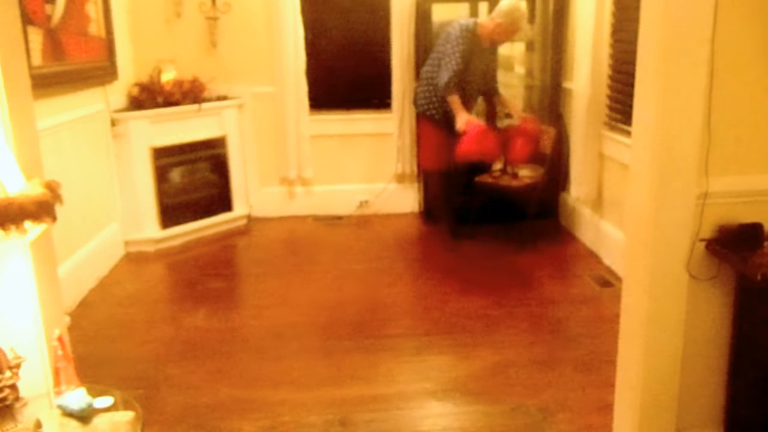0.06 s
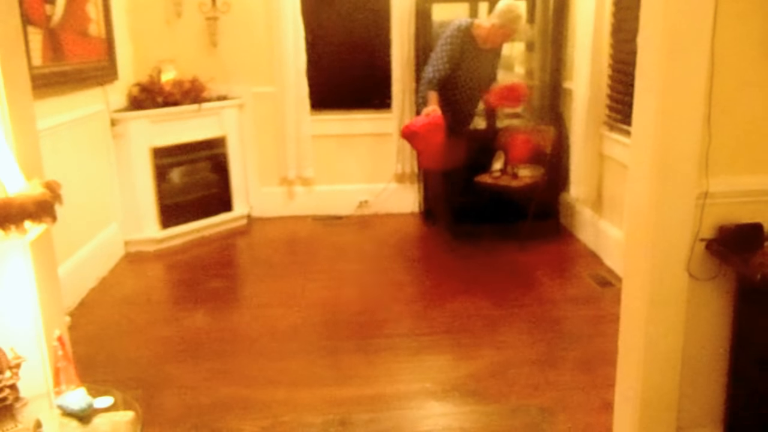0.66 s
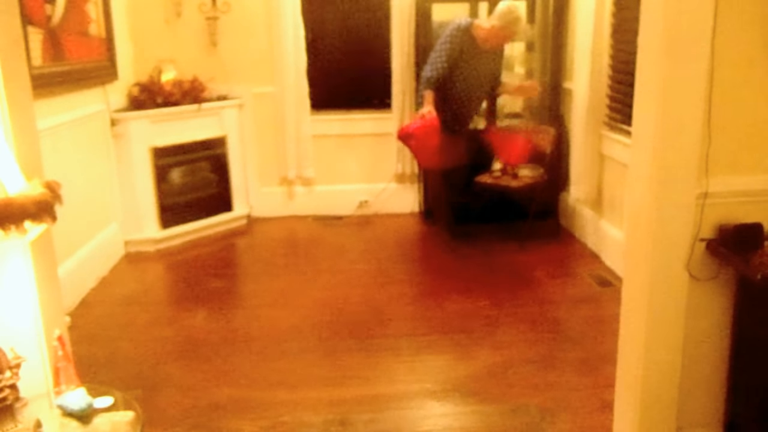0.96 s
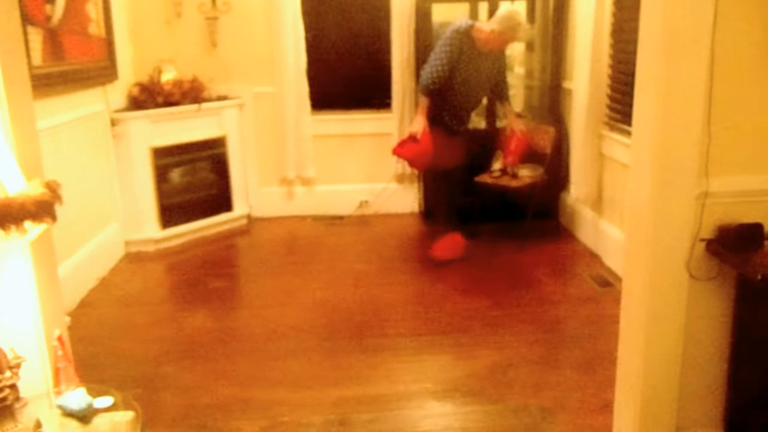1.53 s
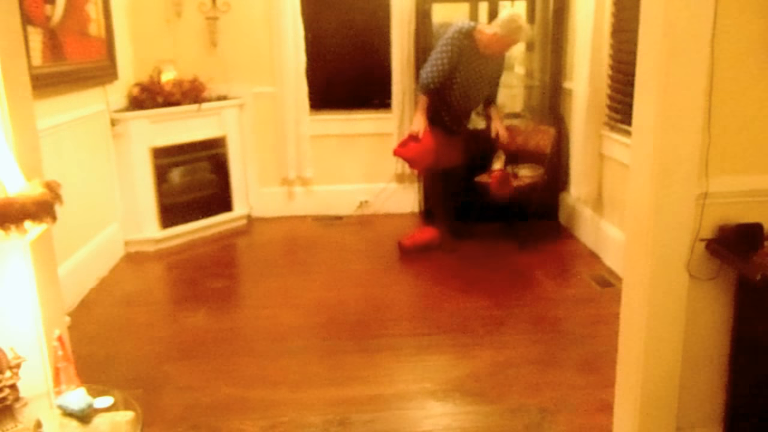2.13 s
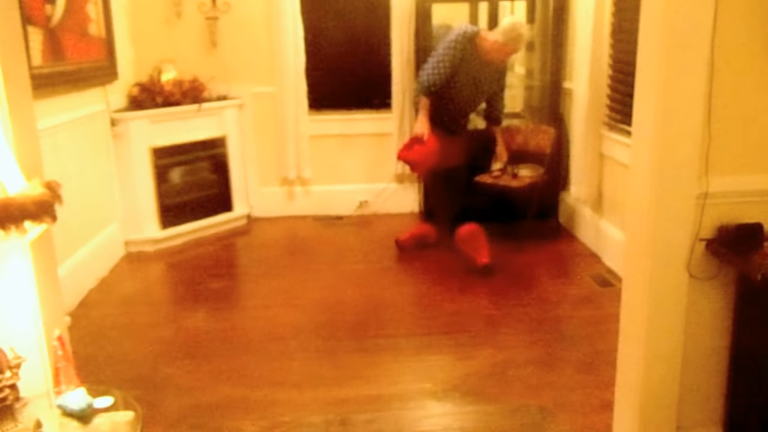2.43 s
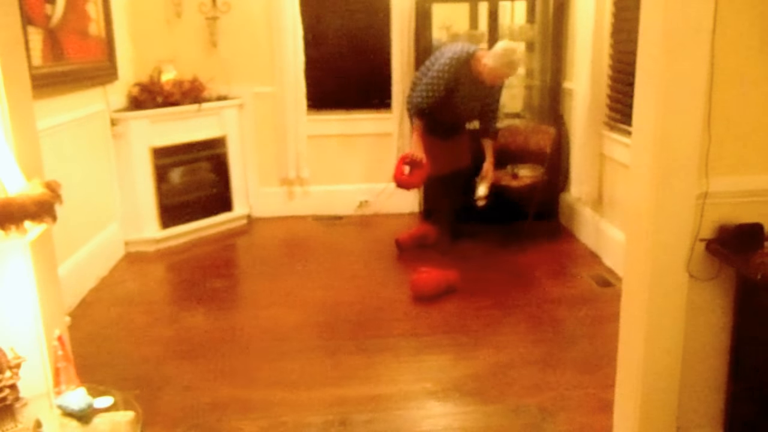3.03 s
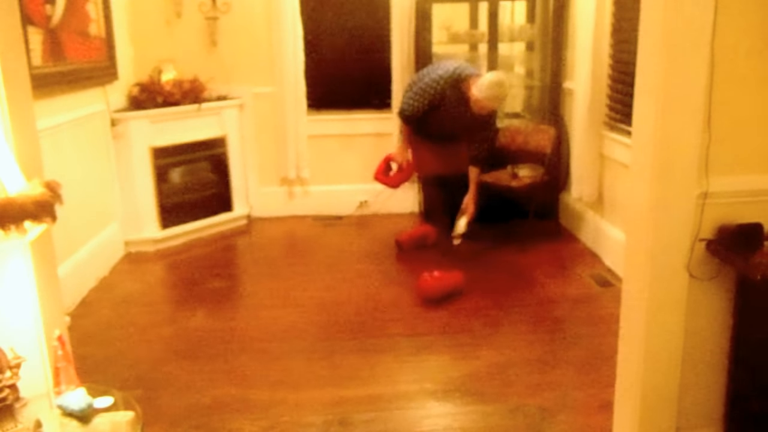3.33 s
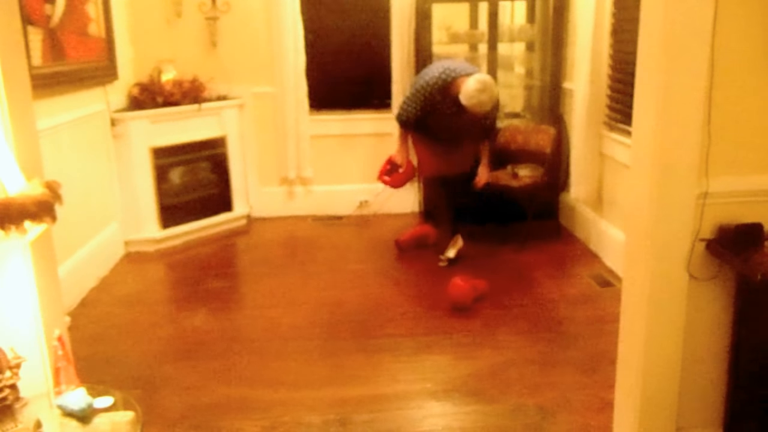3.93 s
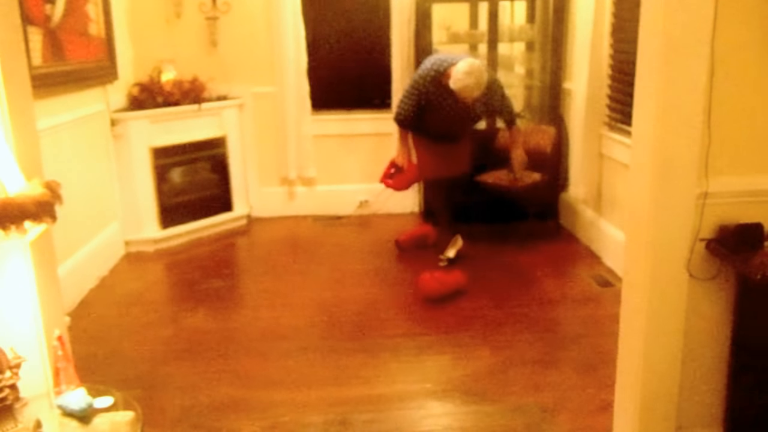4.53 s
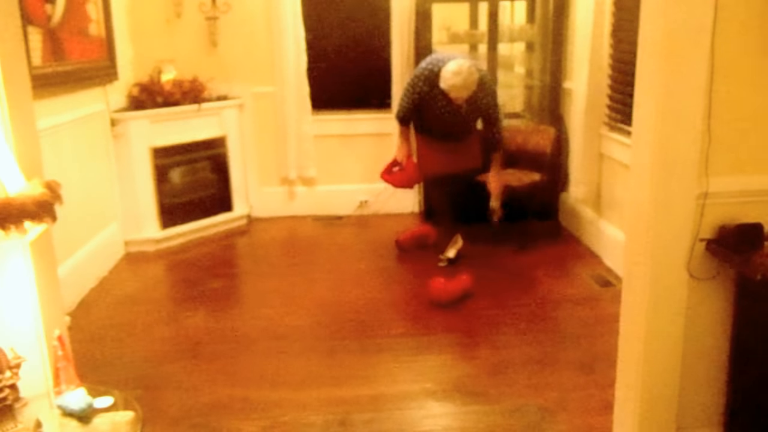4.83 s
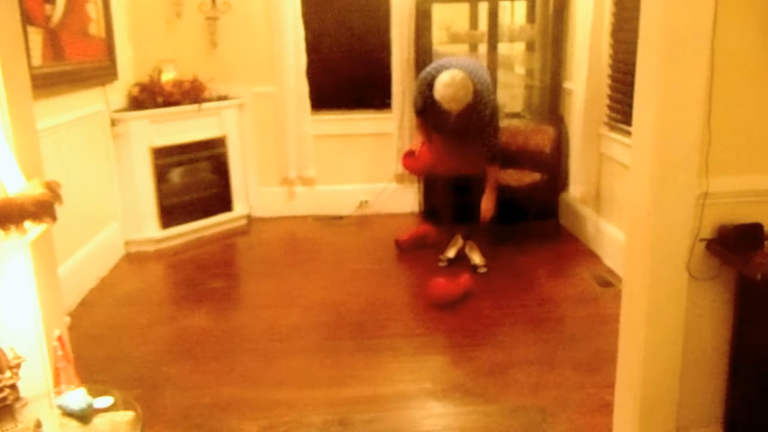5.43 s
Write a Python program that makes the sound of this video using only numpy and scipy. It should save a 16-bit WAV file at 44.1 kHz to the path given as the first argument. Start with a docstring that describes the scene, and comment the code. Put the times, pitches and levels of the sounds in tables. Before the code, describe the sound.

Shoes are dropped on a wooden floor, heard by one microphone across an echoing room. First come two flat slipper slaps, each followed by small bounces, then two louder, sharper heel knocks with soft footfalls and a tiny creak between them. The floorboards give a short low boom under each landing. Quiet clothing rustle, light handling clicks and a low appliance hum fill the gaps.

```python
"""A bare living room with a hardwood floor, one microphone across the room, an appliance humming.
Clothes rustle and feet shift as someone starts clearing shoes off a chair. Two slippers are tossed
down, slap the boards and tumble. A heeled shoe drops with a light touch and a hard knock; another
creaks as it is picked up, then drops too. After each knock the boards boom, the joists sway and
the room rings out."""
import sys
import numpy as np
from scipy import signal
from scipy.fft import rfft, irfft
from scipy.io import wavfile
from scipy.ndimage import uniform_filter1d

SR = 44100
rng = np.random.default_rng(int(sys.argv[2]) if len(sys.argv) > 2 else 0)


def wrap_up_sound(samples):
    """Save the sound to the file named by the first command line argument, as 16-bit audio."""
    columns = np.atleast_2d(samples).T
    # keep every value between -1 and 1, then stretch to whole-number steps
    tamed = np.clip(columns, -1, 1)
    steps = np.round(tamed * 32767).astype(np.int16)
    wavfile.write(sys.argv[1], SR, steps)


N = 245460
BLOW_SAMPLES = 44100   # one contact and its decay
TIME = np.arange(N) / SR
BLOW_TIME = TIME[:BLOW_SAMPLES]
BIN_HZ = np.fft.rfftfreq(BLOW_SAMPLES, 1 / SR)


# Slippers landing and bouncing, across the room. Each row: start in seconds, level in dB, bass in dB,
# treble tilt in dB per octave, direct crack in dB, shoe resonance in Hz, its peak in dB,
# board ring in dB, its centre in Hz, joist sway in dB.
SLIPPER_LANDINGS = [(1.1638, -11, -8, -2, 8, 1530, 2.5, -9, 148.6, -10),
                    (1.5320, -27, 5, 1.5, 2, 670, 7.5, -44, 90.5, -16),
                    (1.9450, -41, 2, 1, 0, 770, 5.5, -40, 218, -47),
                    (2.2705, -14.5, 0.5, -1.7, 5, 440, -7.5, -28, 275, -11.5),
                    (2.6195, -34.5, 10.5, 1.9, 3, 935, 8.5, -35, 232, -19.5),
                    (2.7810, -46, 16, 3.5, -8, 1800, 0, -38, 183, -20)]
# The slap of a sole on hardwood. Each row: frequency in Hz, relative level in dB.
SOLE_SPECTRUM = [(30, 2), (60, 22.5), (90, 15), (130, 9.5), (300, 10.5), (500, 2), (1000, -2), (2000, -1.5),
                 (4000, -2.5), (6000, -7), (9000, -11.5), (14000, -23.5), (16000, -48)]


def slippers():
    """Flat soles slap the boards, then tumble in softer bounces."""
    return landings(SLIPPER_LANDINGS, SOLE_SPECTRUM, bass_hz=474)


# Heeled shoes on the same floor, first touch then full weight. Each row reads as for the slippers.
HEEL_LANDINGS = [(3.6152, -22, -5, 5.5, -1, 2400, 4, -44, 90, -16.5),
                 (3.6446, -2, 0.5, -1.7, -8, 2070, -5.5, -10, 327, -26),
                 (5.2867, -18.5, -11, 2, -3, 1050, -5, -29, 120, -45),
                 (5.3180, -0.9, 0.2, -1.34, -0.5, 2700, 2.5, -12, 213, -27)]
# The knock of a heel. Each row: frequency in Hz, relative level in dB.
HEEL_SPECTRUM = [(30, -11), (60, 1), (90, 6), (130, 3.5), (280, 9.5), (420, 6), (560, 2), (800, -1),
                 (1100, 1), (1600, -4), (2200, -6), (3200, -14), (5000, -21.5), (8000, -32.5),
                 (14000, -47.5)]
# Metal in the heel. Each row: frequency in Hz, level in dB against the landing, 60 dB decay in seconds.
HEEL_PIN_MODES = [(6230, -52, 0.66), (11750, -63, 0.88), (12730, -64, 0.52)]


def heeled_shoes():
    """Hard heels knock on the wood, and the metal in them rings faintly."""
    out = landings(HEEL_LANDINGS, HEEL_SPECTRUM, bass_hz=453)
    for start, level_db, *_ in HEEL_LANDINGS:
        add(out, start, from_db(level_db) * rings(HEEL_PIN_MODES))
    return out


def landings(rows, spectrum, bass_hz):
    """Each landing sends a coloured crack into the room and sets the boards and joists going."""
    out = np.zeros(N)
    bass_shelf = 1 / (1 + (BIN_HZ / bass_hz) ** 3)
    for start, level_db, bass_db, tilt_db, direct_db, body_hz, body_db, ring_db, ring_hz, sway_db in rows:
        tone_db = bass_db * bass_shelf + treble(tilt_db) + shoe_body(body_hz, body_db)
        crack = colour(room(direct_db), at_hz(spectrum, BIN_HZ) + level_db + tone_db)
        add(out, start, crack + from_db(ring_db) * floorboards(ring_hz) + from_db(sway_db) * joists())
    return out


# The boom of the floor. Each row: frequency in Hz, relative level in dB, 60 dB decay in seconds.
BOARD_MODES = [(60, -4, 0.81), (92.2, 3, 0.44), (129, -7, 0.35), (164.6, 1.5, 0.43), (176, -7, 0.37),
               (210, -17, 0.62), (233.9, -7.5, 0.68), (258.3, -11, 0.71), (296.4, -1, 0.49),
               (318, -5, 0.64), (351.5, -8.5, 0.86), (380, -8, 0.8), (445.6, -4, 0.57), (528, -24, 0.47)]


def floorboards(centre_hz, falloff_db=14.5, swell_s=0.014):
    """The struck spot favours the modes near one pitch; they swell as the wave crosses the floor."""
    favoured = [(hz, db - falloff_db * np.log2(hz / centre_hz) ** 2, t60) for hz, db, t60 in BOARD_MODES]
    swell = 1 - np.exp(-BLOW_TIME / swell_s)
    return rings(favoured, scatter_db=3.5) * swell * bass_return()


def joists(hz=22.44, t60_s=0.61, swell_s=0.052, gain_db=9.0):
    """The whole floor bounces slowly on its joists."""
    envelope = from_db(gain_db - 60 * BLOW_TIME / t60_s) * (1 - np.exp(-BLOW_TIME / swell_s))
    return envelope * np.sin(2 * np.pi * hz * BLOW_TIME)


# Feet shifting by the chair. Each row: start in seconds, level in dB, treble tilt in dB per octave,
# board ring in dB, its centre in Hz, joist sway in dB.
FOOTFALLS = [(0.116, -40, 1, -47.5, 190, -57), (2.950, -36.5, 5.5, -42.5, 303, -30),
             (4.477, -33.5, -4, -38.5, 100, -58), (4.583, -29.5, -2, -36.5, 163, -25.5),
             (4.835, -34, -3, -43.5, 129, -50), (5.039, -52, -9, -44, 129, -35)]
# The pad of a foot. Each row: frequency in Hz, relative level in dB.
FOOT_SPECTRUM = [(30, -25), (100, 6.5), (200, 11), (400, -10), (1000, -26), (4000, -29), (14000, -47)]


def steps(direct_db=-15.0):
    """Soft footfalls: a dull pad, with the boards and joists under it."""
    out = np.zeros(N)
    for start, level_db, tilt_db, ring_db, ring_hz, sway_db in FOOTFALLS:
        pad = colour(room(direct_db), at_hz(FOOT_SPECTRUM, BIN_HZ) + level_db + treble(tilt_db))
        add(out, start, pad + from_db(ring_db) * floorboards(ring_hz) + from_db(sway_db) * joists())
    return out


# Shoes handled at the chair. Each row: start in seconds, level in dB, treble tilt in dB per octave,
# direct sound in dB, shoe resonance in Hz, its peak in dB.
HANDLING_CLICKS = [(.104, -43, -1, -5, 1100, -1), (.158, -42.5, -1.5, -6, 4500, 5),
                   (0.465, -53.5, -2, 0, 1720, 10), (.692, -50, -1, 2.5, 4000, 2),
                   (2.950, -42.5, -6, -3, 590, 6), (4.264, -39, -6.5, -15, 2800, 0)]
# One small click. Each row: frequency in Hz, relative level in dB.
CLICK_SPECTRUM = [(30, -7), (400, 3), (1200, 2.5), (1800, -3.5), (2400, -0.5), (5000, -3.5), (9000, -11),
                  (14000, -26)]
# A shoe buckle. Each row: frequency in Hz, relative level in dB, 60 dB decay in seconds.
BUCKLE_MODES = [(2320, -12, 0.027), (2600, -10, .04), (4050, -17, .03), (4800, -13, .03), (6000, -16, .025)]


def handling():
    """Light clicks with a short buckle ring: they reach the room but do not move the floor."""
    out = np.zeros(N)
    for start, level_db, tilt_db, direct_db, body_hz, body_db in HANDLING_CLICKS:
        tone_db = treble(tilt_db) + shoe_body(body_hz, body_db, octaves=0.47)
        click = colour(room(direct_db), at_hz(CLICK_SPECTRUM, BIN_HZ) + level_db + tone_db)
        add(out, start, click + from_db(level_db + direct_db) * rings(BUCKLE_MODES))
    return out


def creak(start_s=4.4137, level_db=-38.5, slips=3, gap_s=0.00225, slip_loss_db=6.0, low_cut_hz=1500):
    """A lifted shoe creaks: quick, evenly spaced slips give a thin pitched click and shake the buckle."""
    low_cut_db = -10 * np.log10(1 + (low_cut_hz / (BIN_HZ + 1)) ** 4)
    tone_db = at_hz(CLICK_SPECTRUM, BIN_HZ) + shoe_body(2350, peak_db=1.0, octaves=0.19) + low_cut_db
    slip = colour(room(direct_db=4.0), tone_db) + from_db(6.0) * rings(BUCKLE_MODES)
    out = np.zeros(N)
    for k in range(slips):
        add(out, start_s + k * gap_s, from_db(level_db - k * slip_loss_db) * slip)
    return out


# Arm and body movements at the chair. Each row: start in seconds, length in seconds, level in dB.
MOVEMENTS = [(-.02, .1, -59), (.07, .09, -54.5), (0.678, 0.054, -62), (2.737, 0.18, -57.5),
             (3.113, 0.31, -56), (3.466, 0.1, -59.5), (4.26, 0.31, -60), (4.79, 0.12, -60),
             (5.126, 0.18, -59.5)]
# Cloth rubbing on cloth. Each row: frequency in Hz, relative level in dB.
CLOTH_SPECTRUM = [(300, -29), (1200, -5), (3000, 1.5), (5500, -1.5), (9000, -8), (14000, -17.5)]


def rustle(attack_s=0.057, fade_db_per_s=110, grain_db=0.5):
    """Each movement swells, holds and dies away; the cloth slides with a slightly uneven grain."""
    power = 0
    for start, length_s, level_db in MOVEMENTS:
        swell = np.clip((TIME - start) / attack_s, 0, 1)
        fade_db = fade_db_per_s * np.maximum(TIME - start - length_s, 0)
        power += (swell * from_db(level_db - fade_db)) ** 2
    grain = rms_one(uniform_filter1d(rng.standard_normal(N), size=400))
    return rms_one(noise(CLOTH_SPECTRUM)) * np.sqrt(power) * from_db(grain_db * grain)


# The nearest surfaces. Each row: delay at the microphone in seconds, gain against the direct sound.
NEAR_ECHOES = [(.0011, 0.2), (.002, 0.38), (.0043, 0.3), (.0052, .33), (0.0127, 0.45)]
# Bright plank overtones. Each row: frequency in Hz, relative level in dB, 60 dB decay in seconds.
PLANK_MODES = [(634, -22, 0.65), (720, -20, 0.37), (765, -28, 0.78), (848, -25.5, 0.34), (929, -32, 0.89),
               (1033, -21.5, 0.66), (1166, -31, 0.9), (1211, -20.5, 0.44), (1390, -23.5, 0.41),
               (1480, -29, 0.33), (1975, -19, .35), (2070, -17.5, 0.25), (2167, -22.5, 0.33),
               (3410, -20, 0.33), (5000, -26, 0.23)]


def room(direct_db, crack_db=21.5, crispness=0.43, build_s=0.00079, planks_db=-2.0):
    """One click as it reaches the microphone: direct sound, near echoes, then tail and ringing planks."""
    out = room_tail() + from_db(planks_db) * rings(PLANK_MODES)
    out *= 1 - np.exp(-BLOW_TIME / build_s)
    direct = from_db(crack_db + direct_db)
    out[:2] += direct * np.array([1 + crispness, -crispness])   # the straight path keeps the most treble
    for delay_s, strength in NEAR_ECHOES:
        out[round(delay_s * SR)] += strength * direct
    return out


# The ring of the bare room. Each row: band centre in Hz, 60 dB decay in seconds.
ROOM_DECAY = [(60, 0.58), (200, 0.77), (560, 0.74), (1500, 0.66), (4000, 0.56), (7000, 0.47), (13000, 0.32)]


def room_tail(first_echoes_per_s=1500, thicken_s=0.02):
    """Scattered echoes crowd ever closer together and die away band by band."""
    density = np.clip(first_echoes_per_s / SR * (1 + (BLOW_TIME / thicken_s) ** 2), 1e-3, 1)
    signs = rng.choice([-1, 1], BLOW_SAMPLES)
    arrivals = rng.random(BLOW_SAMPLES) < density
    echo_spectrum = rfft(signs * arrivals / np.sqrt(density))
    tail, centres = 0, [hz for hz, _ in ROOM_DECAY]
    for this_band, (hz, t60) in zip(np.eye(len(centres)), ROOM_DECAY):
        band_gain = at_hz(list(zip(centres, this_band)), BIN_HZ)
        band = irfft(echo_spectrum * band_gain) * from_db(-60 * BLOW_TIME / t60)
        tail += band * (bass_return() if hz < 400 else 1)
    return even_out(tail)


def even_out(tail, fine_bins=45, broad_bins=500):
    """Smooth the random tail's narrow peaks and dips so the room's decay sounds even."""
    power = np.abs(rfft(tail)) ** 2
    fine, broad = (uniform_filter1d(power, size=bins) for bins in (fine_bins, broad_bins))
    return colour(tail, 10 * np.log10(broad / fine))


def bass_return(delay_s=0.11, width_s=0.028, lift_db=4.0):
    """Low sound swells again when it comes back from the far end of the house."""
    return from_db(lift_db * np.exp(-((BLOW_TIME - delay_s) / width_s) ** 2))


# An appliance in the background. Each row: frequency in Hz, rms level in dB, line width in Hz.
APPLIANCE_TONES = [(174.5, -65, 3.05), (361.4, -53.5, 2.6), (7860, -72, 48)]


def appliance():
    """A low hum and a thin whine, each wandering in phase."""
    out = 0
    for hz, level_db, width_hz in APPLIANCE_TONES:
        jitter = uniform_filter1d(rng.standard_normal(N), size=300)
        wander = np.cumsum(jitter) * np.sqrt(2 * np.pi * width_hz / SR)
        out += from_db(level_db) * np.sqrt(2) * np.sin(2 * np.pi * hz * TIME + wander)
    return out


# Room tone at the microphone. Each row: frequency in Hz, relative level in dB.
AIR_SPECTRUM = [(12, -4), (23, 0), (35, -10), (60, -18), (110, -24), (200, -30.5), (420, -36), (600, -39.5),
                (1200, -44), (2500, -50.5), (5000, -55), (9000, -60), (14000, -63.5)]


def still_air(gain_db=-4):
    """The still air of the room: a low rumble under a faint hiss."""
    return from_db(gain_db) * noise(AIR_SPECTRUM)


def rings(modes, scatter_db=-2.5):
    """Struck modes, each with a strength and phase of its own for this blow."""
    out = 0
    for hz, level_db, t60 in modes:
        envelope = from_db(level_db + scatter_db * rng.standard_normal() - 60 * BLOW_TIME / t60)
        out += envelope * np.sin(2 * np.pi * (hz * BLOW_TIME + rng.random()))
    return out


def treble(tilt_db, corner_hz=1450):
    """dB by frequency: a shorter, harder contact holds more treble."""
    return tilt_db * np.log2(1 + (BIN_HZ / corner_hz) ** 2) / 2


def shoe_body(centre_hz, peak_db, octaves=0.5):
    """dB by frequency: each part of a shoe has a broad resonance or dip of its own."""
    return peak_db * np.exp(-(np.log2((BIN_HZ + 1) / centre_hz) / octaves) ** 2)


def colour(x, gain_db):
    """Causal (minimum-phase) filter from a dB gain for every frequency bin."""
    cepstrum = irfft(np.log(from_db(gain_db)))
    cepstrum[1:len(x) // 2] *= 2
    cepstrum[len(x) // 2 + 1:] = 0
    return irfft(rfft(x) * np.exp(rfft(cepstrum)))


def noise(spectrum):
    """Steady noise with the given spectrum."""
    gain = from_db(at_hz(spectrum, np.fft.rfftfreq(N, 1 / SR)))
    return irfft(rfft(rng.standard_normal(N)) * gain, N)


def at_hz(points, hz):
    """Read a table along log frequency."""
    knots, values = np.transpose(points)
    return np.interp(np.log(np.maximum(hz, 1)), np.log(knots), values)


def from_db(db):
    """Decibels to gain."""
    return 10 ** (np.asarray(db) / 20)


def rms_one(x):
    """Scale to unit power."""
    return x / np.sqrt(np.mean(x ** 2) + 1e-20)


def add(out, start_s, sound):
    """Mix a sound in from its start time."""
    start = round(start_s * SR)
    out[start:start + len(sound)] += sound[:N - start]


def scene():
    """Shoes, feet and clothes over the quiet room, in mono."""
    shoes = slippers() + heeled_shoes()
    person = steps() + handling() + creak() + rustle()
    return (shoes + person + appliance() + still_air())[None]


def record(dry, ceiling=0.92, cutoff_hz=14300):
    """The sharpest peaks overload; the top of the treble is cut."""
    clipped = np.clip(dry, -ceiling, ceiling)
    low_pass = signal.ellip(12, 0.2, 90, cutoff_hz, fs=SR, output="sos")
    return signal.sosfilt(low_pass, clipped)


dry = scene()
out = record(dry)
wrap_up_sound(out)
```